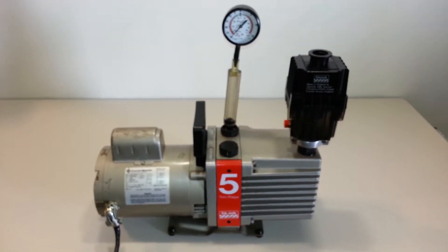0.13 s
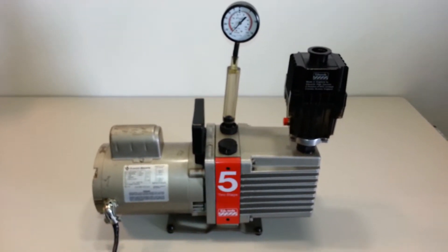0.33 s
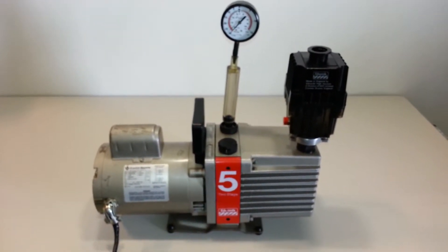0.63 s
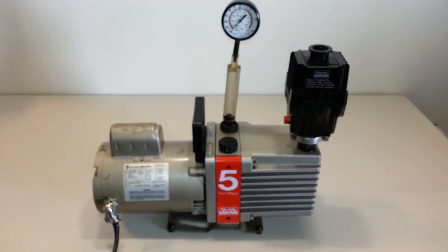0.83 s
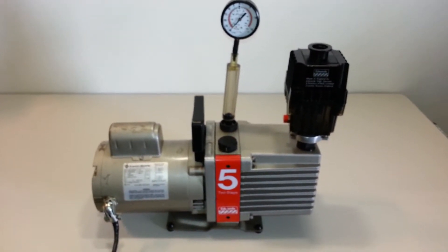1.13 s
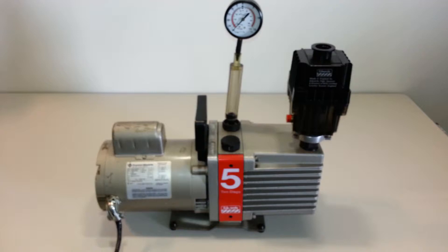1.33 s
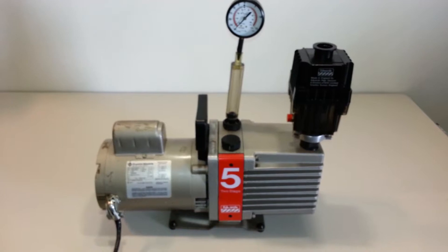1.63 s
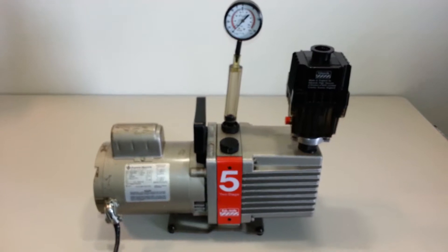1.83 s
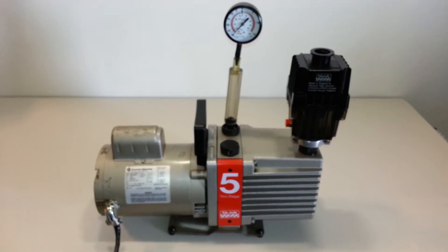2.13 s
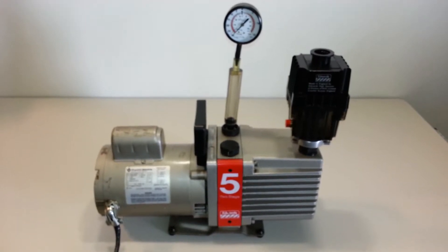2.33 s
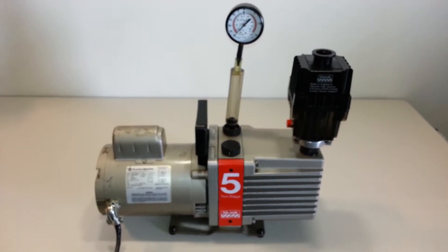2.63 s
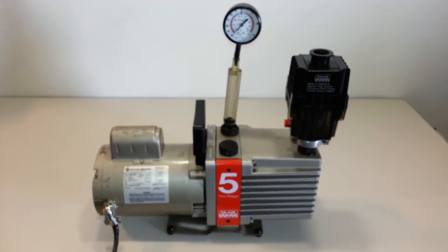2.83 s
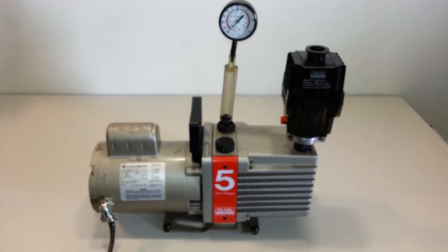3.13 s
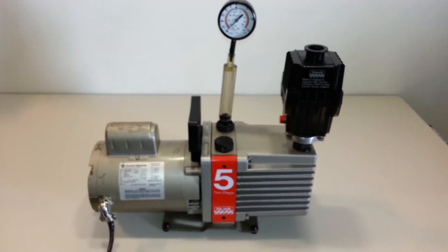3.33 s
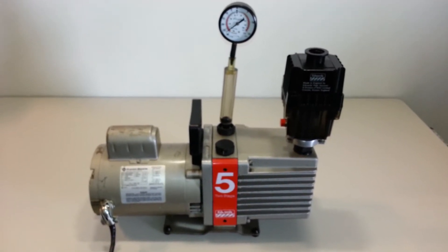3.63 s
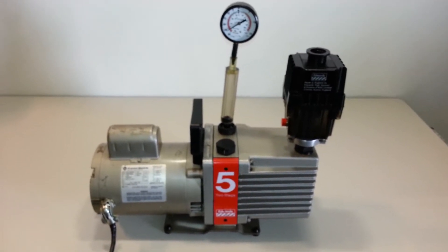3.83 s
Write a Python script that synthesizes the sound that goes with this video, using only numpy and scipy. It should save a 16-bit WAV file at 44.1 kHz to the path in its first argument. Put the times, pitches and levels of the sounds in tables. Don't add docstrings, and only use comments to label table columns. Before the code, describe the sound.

A small electric vacuum pump runs close to the microphone with steady low hum and airy rattle, is switched off, coasts down within a fraction of a second, then a sharp click rings briefly in a quiet room.

```python
import sys
import numpy as np
from scipy import signal
from scipy.fft import rfft, irfft
from scipy.io import wavfile
from scipy.ndimage import map_coordinates

SR = 44100
rng = np.random.default_rng(int(sys.argv[2]) if len(sys.argv) > 2 else 0)


def pcm_store(signal):
    levels = np.round(np.clip(np.atleast_2d(signal), -1, 1) * 32767)
    wavfile.write(sys.argv[1], SR, levels.astype(np.int16).T)


def attenuation_scalar(level_db):
    decades = np.asarray(level_db, float) / 20
    return 10 ** decades


N = 176400
T = np.arange(N) / SR
HZ = np.fft.rfftfreq(184320, 1 / SR)

SHAFT_HZ = 29.2437
OFF_S = 3.092
# frequency in Hz, level in dB.
RATTLE_COLOUR = [(40, 2), (90, 2.5), (400, -2.5), (1200, -7.5), (2500, -5.5), (5800, -11.5), (8500, -26.5),
                 (15000, -24)]


def read(points, hz):
    f, value = np.transpose(points)
    return np.interp(np.log(hz + 1), np.log(f + 1), value)


def evened(x):
    return x / np.sqrt(np.mean(x ** 2) + 1e-20)


def colour(x, gain):
    size = 2 * len(HZ) - 2
    return irfft(rfft(x, size) * gain, size)[..., :N]


def drift(per_s):
    knots = rng.standard_normal(size=200)
    return map_coordinates(knots, [T * per_s + 3], order=3)


def tone(turns, db, waver, free=True):
    waver_per_s = 9.0
    wobble = 1 + waver * (drift(waver_per_s) + 1j * drift(waver_per_s))
    phase = turns + free * rng.random()
    return np.sqrt(2) * attenuation_scalar(db) * (wobble * np.exp(2j * np.pi * phase)).real


def hum(shaft):
    # mains multiple, shaft sideband order, level in dB.
    hum_lines = np.array([(1, 0, -83), (2, 0, -39.4), (2, -1, -67), (2, 1, -73), (4, 0, -77), (6, 0, -68.3),
                 (10, 0, -84)])
    mains_hz, start_turn = 59.985, -0.227
    fade_s = 0.018
    mains = mains_hz * T + start_turn
    power_on = np.exp(-(np.maximum(T - OFF_S, 0) / fade_s) ** 2)
    return power_on * sum(tone(m * mains + side * shaft, db, 0.024, free=False) for m, side, db in hum_lines)


def shaft_comb(shaft, strong):
    level_db, spread_db, odd_db = -86, 5.5, -3
    k = np.arange(1, 240)
    db = level_db + spread_db * rng.standard_normal(len(k)) + odd_db * (k % 2)
    size = attenuation_scalar(db + read(RATTLE_COLOUR, k * SHAFT_HZ) + 6)
    size = size * ~np.isin(k, strong) * np.minimum(k / 19, 1) ** 2
    spectrum = np.r_[0, size * np.exp(2j * np.pi * rng.random(len(k)))]
    turn = irfft(spectrum, 4096) * 4096 / np.sqrt(2)
    return np.interp(shaft % 1 * 4096, np.arange(4097), np.r_[turn, turn[0]])


def shaft_orders(shaft):
    # shaft order, level in dB.
    strong_orders = np.array([(2, -69), (6, -77), (8, -79), (10, -74), (12, -64.5), (20, -78.5),
                     (22, -78.5), (24, -77.5), (26, -80), (28, -73), (34, -75.5), (38, -79.5), (48, -77),
                     (50, -65), (64, -79), (70, -74), (72, -79.5), (80, -77), (90, -75), (100, -79.5),
                     (110, -78.5), (120, -80), (122, -80.5), (128, -81), (130, -80), (144, -77)])
    comb = shaft_comb(shaft, strong_orders[:, 0])
    return comb + sum(tone(order * shaft, db, 0.11, free=order > 12.5) for order, db in strong_orders)


def bearing_whine(shaft):
    # multiple of the bearing rate, level in dB.
    whine_lines = np.array([(2, -74.5), (2.5, -80), (4, -84), (10, -82), (11, -78), (12, -84), (13, -73.5),
                   (14, -71), (15, -78), (15.54, -79)])
    bearing_hz, cage_hz, cage_depth = 253.83, 18.2, 0.5
    cage = 1 + cage_depth * np.cos(2 * np.pi * shaft * cage_hz / SHAFT_HZ)
    whine = np.zeros(N)
    for multiple, db in whine_lines:
        line = tone(multiple * shaft * bearing_hz / SHAFT_HZ, db, 0.2)
        whine += line * cage if multiple > 9 else line
    return whine


def rattle(shaft):
    # resonance in Hz, width in Hz, lift in dB.
    body_modes = [(768, 52, 7), (1410, 73, 7.5), (1940, 190, 3.5), (2777, 18, 6), (3313, 86, 7.5),
                  (3560, 34, 9), (3917, 49, 11), (4342, 38, 11), (4690, 36, 11), (4950, 72, 5),
                  (5190, 105, 5), (5440, 88, 9), (5970, 94, 6), (6630, 190, 9.5)]
    level_db, grain_db, grains_per_s = -56, 3.5, 5000
    vane_throb, chance_throb = 0.025, 0.064
    size = attenuation_scalar(grain_db * np.minimum(rng.exponential(1, (2, N)), 5))
    size = size * (rng.random((2, N)) < grains_per_s / SR)
    grains = evened(size * rng.choice([-1., 1.], (2, N))) + 0.68 * rng.standard_normal((2, N))
    throb = 1 + vane_throb * (np.cos(4 * np.pi * shaft) + np.cos(20 * np.pi * shaft))
    throb = throb + chance_throb * drift(22.66)
    body = 1 + sum((attenuation_scalar(db) - 1) / (1 + ((HZ - hz) / (w / 2)) ** 2) for hz, w, db in body_modes)
    return attenuation_scalar(level_db) * throb * evened(colour(grains, body * attenuation_scalar(read(RATTLE_COLOUR, HZ))))


def noise_floor():
    # frequency in Hz, level in dB per Hz.
    air_colour = [(18, -37), (40, 3), (305, -15), (339, -16), (386, -8.5), (514, -15.5), (936, -19),
                  (1040, -19.5), (15200, -32)]
    # frequency in Hz, likeness from 0 to 1.
    air_likeness = [(60, 0.62), (400, 0.17), (1400, 0.17), (3000, 0.05)]
    # frequency in Hz, level in dB.
    distant_drones = [(247.6, -90), (306.8, -83.5), (360.7, -88), (382.2, -84.5), (430.7, -104),
                      (479.1, -101)]
    level_db = -69.5
    a, b = rng.standard_normal((2, N))
    same = np.clip(read(air_likeness, HZ), 0, 1)
    left = colour(a, same) + colour(b, np.sqrt(1 - same ** 2))
    air = evened(colour(np.array([left, a]), attenuation_scalar(read(air_colour, HZ))))
    return attenuation_scalar(level_db) * air + sum(tone(hz * T, db, 0.15) for hz, db in distant_drones)


def rings():
    # start in seconds, frequency in Hz, level in dB, swell in seconds, t60 in seconds.
    long_modes = [(3.114, 114.5, -38.5, .01, .15), (3.15, 131, -57, .02, .4), (3.262, 78, -58, .008, .15),
                  (3.165, 503, -65, .03, .7), (3.10, 812, -68, .03, .6), (3.10, 335, -60, .01, .12),
                  (3.12, 56, -60, .05, 1.2), (3.12, 66, -71, .04, .6), (3.35, 4667, -67, .02, .8),
                  (3.35, 4400, -76, .01, .5), (3.35, 4870, -72, .01, .5), (3.35, 5080, -73, .02, .6),
                  (3.35, 5270, -77, .01, .5), (3.38, 1819.7, -69.5, .015, 1.6),
                  (3.385, 1845.5, -79, .02, 1.0), (3.375, 1744, -72, .015, .4), (3.38, 1692, -80, .02, .9),
                  (3.35, 2620, -71, .008, .22), (3.35, 1244, -72, .008, .35), (3.35, 3876, -86, .02, .8),
                  (3.47, 929.5, -80, .015, 6), (3.47, 942.4, -81, .015, 6), (3.35, 3560, -84, .03, 1.1),
                  (3.935, 3521, -78, .02, .6)]
    out = np.zeros(N)
    for start_s, hz, db, swell_s, t60 in long_modes:
        t = np.maximum(T - start_s, 0)
        flutter = 0.2 * hz / 3000 * (drift(32.0) + 1j * drift(34.0))
        envelope = np.sqrt(2) * (1 - np.exp(-t / swell_s)) * attenuation_scalar(db - 60 * t / t60)
        out += envelope * ((1 + flutter) * np.exp(2j * np.pi * hz * t)).imag
    return out


def ticks():
    # start in seconds, level in dB, decay time in seconds.
    impacts = [(3.2005, -54, 0.0013), (3.216, -61, 0.0016), (3.2235, -62, 0.0011), (3.2295, -64, 0.0011),
               (3.267, -50, 0.0023), (3.277, -56, 0.02), (3.2835, -46, 0.0013), (3.302, -50, 0.0012),
               (3.3175, -60, 0.0041), (3.337, -58, .006), (3.3437, -26, 0.0013), (3.3446, -23, 0.0013),
               (3.3463, -31, 0.0046), (3.3525, -33, 0.002), (3.355, -46, 0.03), (3.464, -68, 0.0034),
               (3.924, -78, 0.096)]
    # casing mode in Hz, level in dB, t60 in seconds.
    casing_modes = [(985, -9, .07), (1290, -4, .055), (2130, -9, .04), (2560, -7, .045), (3569, 4, .05),
                    (3800, -10, .03), (4950, -8, .035), (5180, -6, .035), (5900, -5, .035),
                    (6710, -4, .025), (8200, -4, .015), (10600, -2, .012), (13200, 2, .01)]
    # frequency in Hz, level in dB.
    crack_colour = [(300, -22), (750, -21), (1000, -0.5), (2800, -6), (3600, -4), (7000, -8), (9000, -18.5),
                    (14000, -9), (15200, -36)]
    crack_db, casing_db = 0.5, -33
    cracks, t = np.zeros(N), np.arange(3000) / SR
    for start_s, db, decay_s in impacts:
        at = round(start_s * SR)
        cracks[at:at + len(t)] += attenuation_scalar(db) * rng.standard_normal(len(t)) * np.exp(-t / decay_s)
    casing = sum(attenuation_scalar(db - 60 * t / t60) * np.sin(2 * np.pi * hz * t) for hz, db, t60 in casing_modes)
    struck = signal.oaconvolve(cracks, casing)[:N]
    return colour(attenuation_scalar(crack_db) * cracks + attenuation_scalar(casing_db) * struck, attenuation_scalar(read(crack_colour, HZ)))


def tail(t60s, start):
    taps, at = np.zeros(SR), np.arange(start, SR - 20, 20)
    taps[at + rng.integers(0, 20, len(at))] = rng.choice([-1., 1.], len(at))
    hz, t, z = signal.stft(taps, SR, nperseg=128)
    out = signal.istft(z * attenuation_scalar(-60 * t / read(t60s, hz)[:, None]), SR, nperseg=128)[1]
    return out / np.linalg.norm(out)


def in_room(x):
    # frequency in Hz, t60 in seconds.
    room_decay = [(300, 0.36), (1500, 0.88), (4500, 0.84), (9000, 0.57)]
    room_db = -19
    return x + attenuation_scalar(room_db) * signal.fftconvolve(x, tail(room_decay, start=200))[:N]


def ports(x, near, far):
    # cavity resonance in Hz, width in Hz, lift in dB.
    right_cavities = [(3680, 543, 14), (5370, 810, 12), (7970, 470, 9.5), (14600, 550, 7)]
    # frequency in Hz, gain in dB.
    left_shading = [(120, -1.83), (350, -0.5), (1300, -3.5), (2600, -9.5), (4600, -8), (5900, 3),
                    (7500, 5.5), (15000, -3)]
    # frequency in Hz, likeness from 0 to 1.
    port_likeness = [(100, 1), (400, .995), (700, .93), (1300, .75), (2400, .55), (4400, .35), (5500, .6),
                     (8000, .3)]
    lag_s = 0.000005
    right = 1 + sum((attenuation_scalar(db) - 1) / (1 + 1j * (HZ - hz ** 2 / (HZ + 1)) / w) for hz, w, db in right_cavities)
    same = np.clip(read(port_likeness, HZ), 0, 1)
    scattered = signal.fftconvolve(x, tail([(100, 0.034), (9000, 0.033)], start=0))[:N] + far
    left = colour(x + near, same * np.exp(-2j * np.pi * HZ * lag_s))
    left = left + colour(scattered, np.sqrt(1 - same ** 2))
    return np.array([colour(left, attenuation_scalar(read(left_shading, HZ))), colour(x + near, right)])


def scene():
    coast_s, start_turn = 0.32, 0.005
    speed = np.clip(1 - (T - OFF_S) / coast_s, 0, 1)
    shaft = start_turn + np.cumsum(speed) * SHAFT_HZ / SR
    hits = in_room(ticks())
    pump = hum(shaft) + (shaft_orders(shaft) + bearing_whine(shaft)) * speed ** 6
    struck = hits + rings()
    near, far = rattle(shaft) * speed ** 1.26
    return ports(pump + struck, near, far) + noise_floor()


def roll_off(x):
    return signal.sosfilt(signal.butter(12, 15490, fs=SR, output="sos"), x)


def record(dry):
    low_hz, edge_hz = 48, 15490
    band = (HZ < edge_hz) / np.sqrt(1 + (low_hz / (HZ + 1)) ** 6)
    mix = colour(dry, band)
    return roll_off(mix)


dry = scene()
out = record(dry)
pcm_store(out)
```